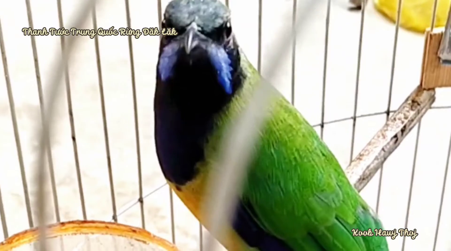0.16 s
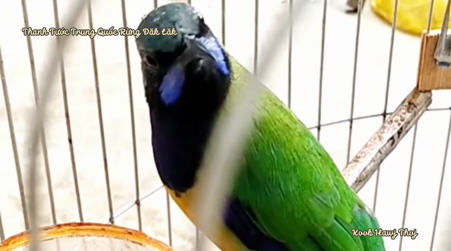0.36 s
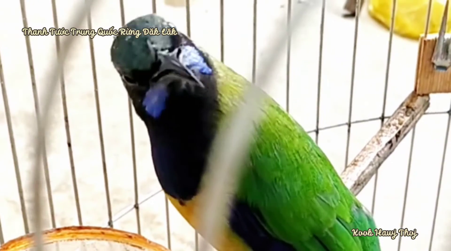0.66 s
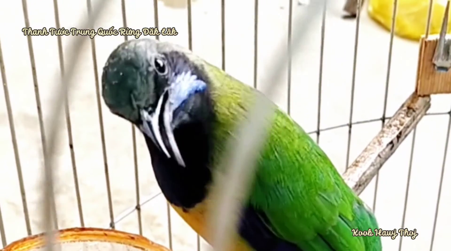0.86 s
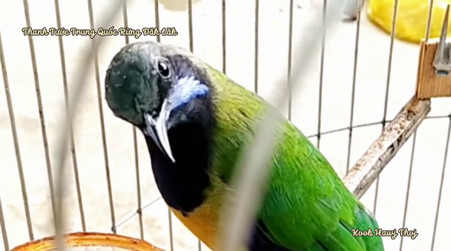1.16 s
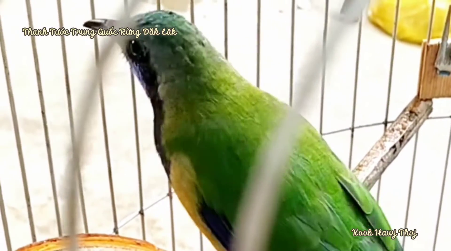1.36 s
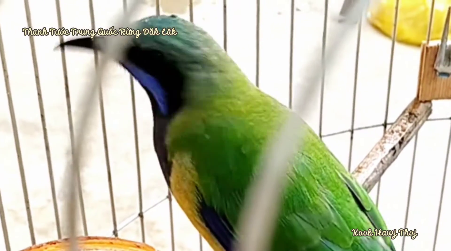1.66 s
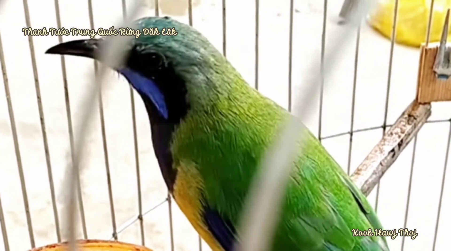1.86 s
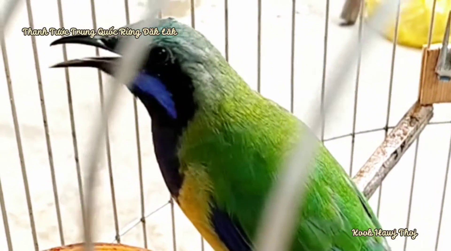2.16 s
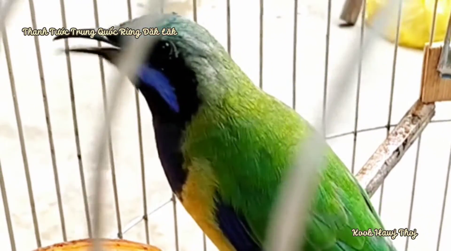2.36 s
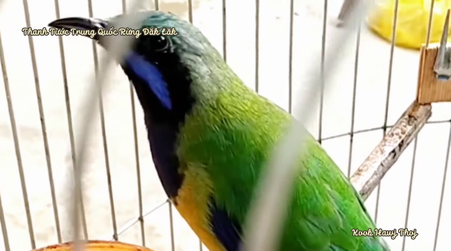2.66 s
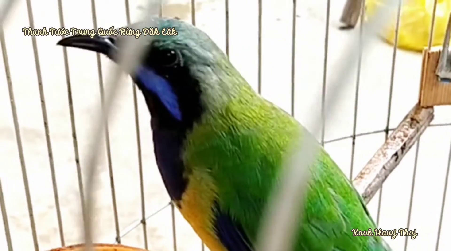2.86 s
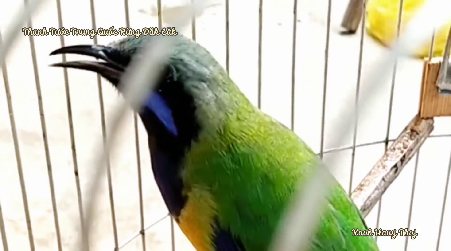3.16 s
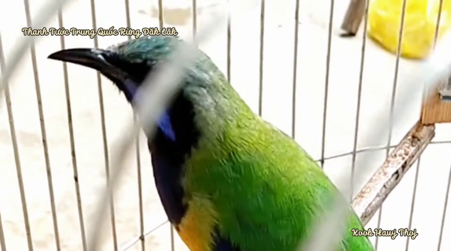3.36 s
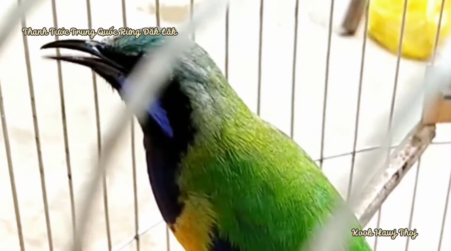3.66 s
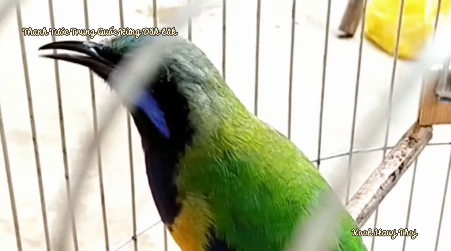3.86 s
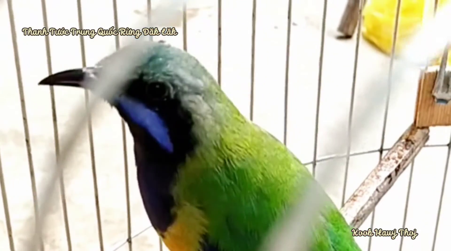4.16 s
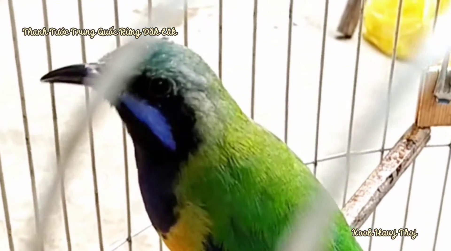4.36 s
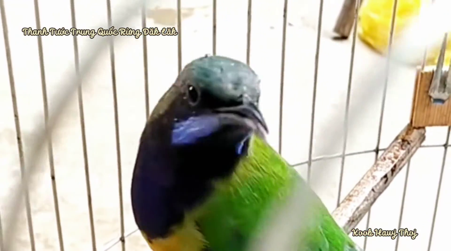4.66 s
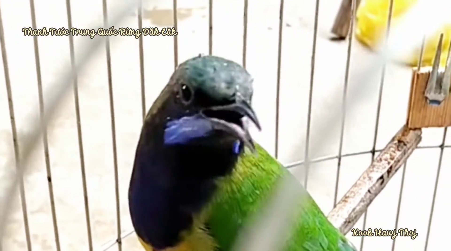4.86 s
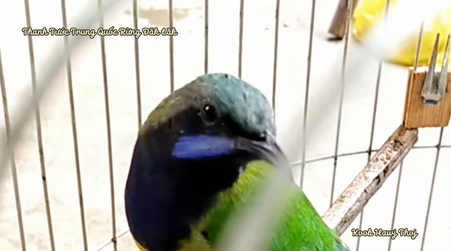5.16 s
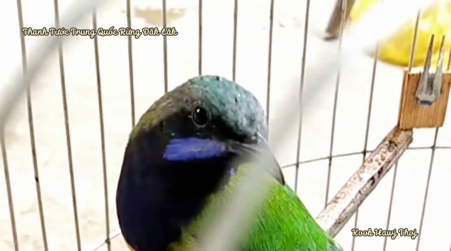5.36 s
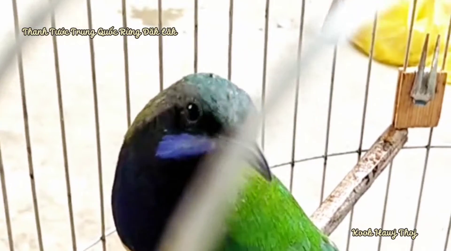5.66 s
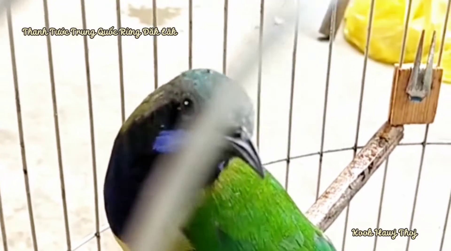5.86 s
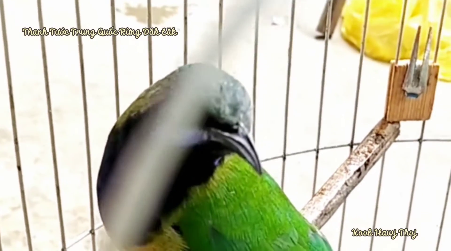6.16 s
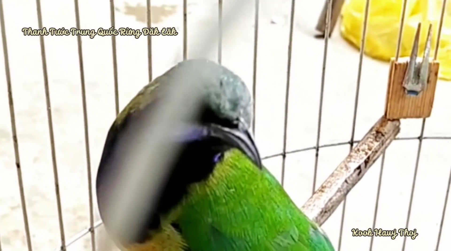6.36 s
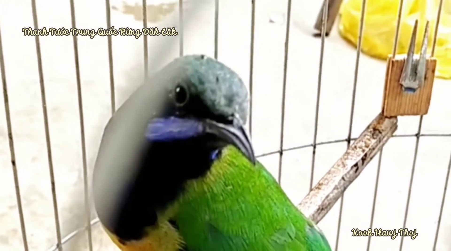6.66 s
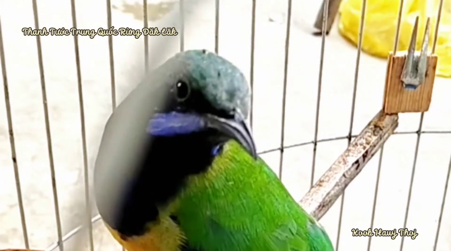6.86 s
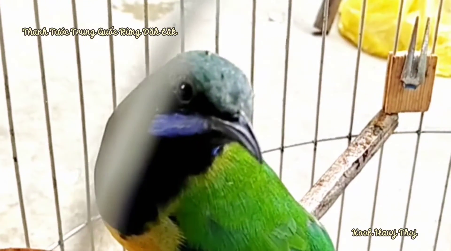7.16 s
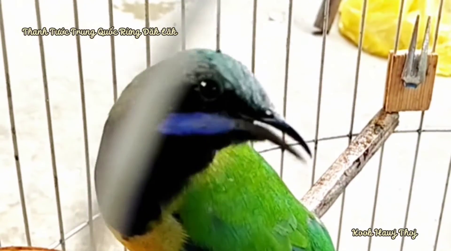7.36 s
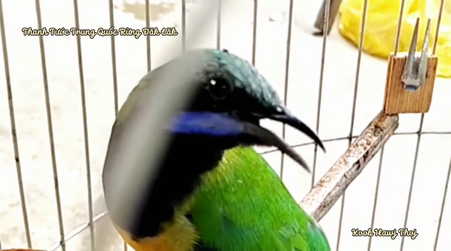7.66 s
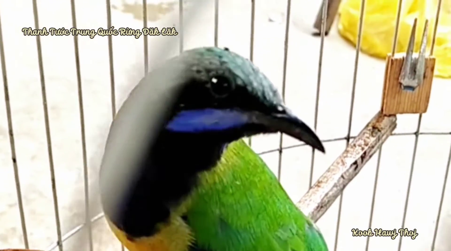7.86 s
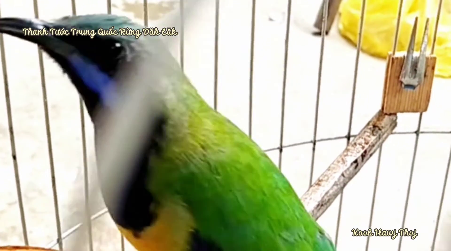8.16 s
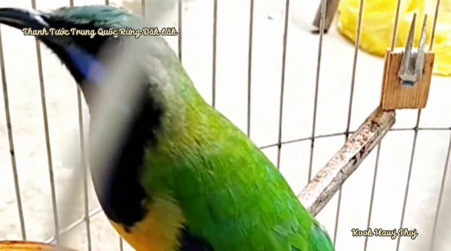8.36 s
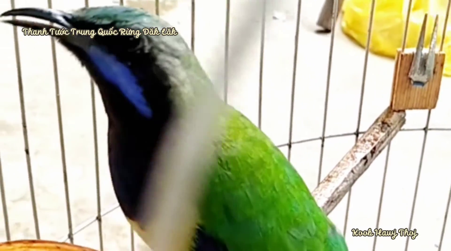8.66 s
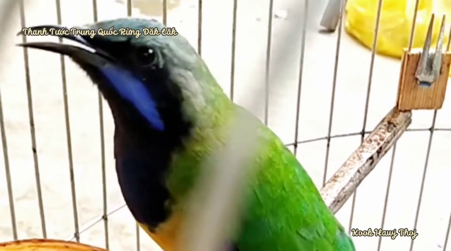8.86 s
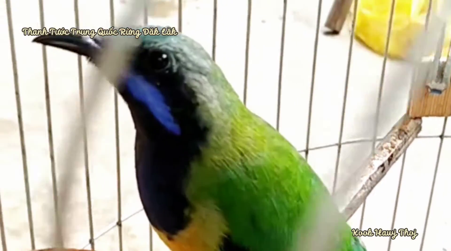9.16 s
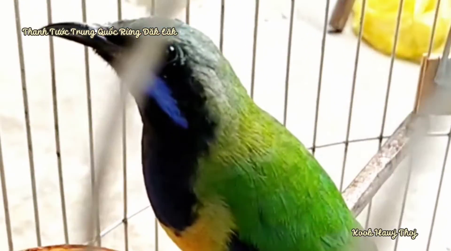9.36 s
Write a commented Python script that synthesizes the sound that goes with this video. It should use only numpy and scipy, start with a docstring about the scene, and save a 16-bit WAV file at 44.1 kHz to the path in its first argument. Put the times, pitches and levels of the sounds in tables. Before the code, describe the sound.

Piercing, clipped birdsong in short phrases very near the microphone, a second bird chirping nearby, claw ticks, puffs of wind and faint engine putter.

```python
"""A caged songbird sings close to a phone microphone in a yard with hard walls: held whistles, short slurs,
arches and peaked chirps, each a sum of partials shaped by a throat and answered by echoes and noise tails.
A bird in another cage chirps round a corner and claws tick on the perch. Puffs of air push the membrane, and
one knock hits the phone. A small engine putters as pulses ringing a pipe, thin far whistles call, and bands
of noise make the yard's murmur and far twitter. A limiter ducks everything after the loudest peaks."""
import sys
import numpy as np
from scipy import signal
from scipy.io import wavfile
from scipy.ndimage import uniform_filter1d, minimum_filter1d

SR = 44100
rng = np.random.default_rng(int(sys.argv[2]) if len(sys.argv) > 2 else 0)


def how_loud(loudness_db):
    """Turn decibels into a plain amplitude multiplier (0 dB gives 1, 20 dB gives 10)."""
    steps = np.asarray(loudness_db, float) / 20
    return 10 ** steps


def waveform_to_disk(signal):
    """Save audio, clipped to [-1, 1], as 16-bit WAV at the path in sys.argv[1]."""
    frames = np.transpose(np.atleast_2d(signal))
    scaled = np.clip(frames, -1, 1) * 32767
    samples = np.round(scaled).astype(np.int16)
    wavfile.write(sys.argv[1], SR, samples)


N = 418950
LEAD = SR // 10   # samples: the song is under way before time zero
M = N + LEAD


def rms_one(x):
    """Scales a signal to an rms of 1."""
    return x / np.sqrt(np.mean(x ** 2) + 1e-20)


def in_time(rows):
    """Interpolates each column of a table over time, its first column being seconds."""
    s, *columns = np.transpose(rows)
    t = np.arange(M) / SR - LEAD / SR
    return [np.interp(t, s, column) for column in columns]


def at_hz(points, hz):
    """Reads a (Hz, dB) curve on a logarithmic frequency axis."""
    curve_hz, curve_db = np.array(points)[:, 0], np.array(points)[:, 1]
    return np.interp(np.log(hz), np.log(curve_hz), curve_db)


def filtered(x, hz, kind, order=2):
    """Butterworth filter."""
    return signal.sosfilt(signal.butter(order, hz, kind, fs=SR, output="sos"), x)


def drift(rate_hz, size):
    """Random wander of rms 1: noise kept below rate_hz."""
    settle = 4000   # samples thrown away while the filter starts
    noise = rng.standard_normal(size + settle)
    return rms_one(filtered(noise, rate_hz, "low", order=4)[settle:])


def resonate(x, hz, width_hz):
    """A single resonance, as of an air column."""
    r = np.exp(-np.pi * width_hz / SR)
    return signal.lfilter([(1 - r * r) / 2, 0, (r * r - 1) / 2],
                          [1, -2 * r * np.cos(2 * np.pi * hz / SR), r * r], x)


def add(out, s, piece, gains):
    """Lays a piece into each row of out at s seconds, with one gain per row."""
    i = round(s * SR) + LEAD
    out[:, i:i + len(piece)] += (np.array(gains)[:, None] * piece)[:, :M - i]


def shaped(top_s, level_db, top_hz, stretch, shape):
    """Rows (s, Hz, dB) of one note made from a pattern."""
    lag_s, share, shape_db = np.transpose(shape)[:3]
    return np.transpose([top_s + stretch * lag_s, share * top_hz, level_db + shape_db])


# colouring by the throat: pitch_hz, level_db
THROAT = [(700, -15), (1500, -17), (2500, -18.5), (3500, -5.5), (5000, 3.5), (6200, -6), (7800, -12.5),
          (9500, -26.5), (12000, -34), (16000, -14.5)]
# source strength of partials 1-5: level_db
OVERTONE_DB = [-3, -10.5, -13.5, -27.5, -12.5]
WARBLE_HZ = 160.9   # rate of the level flutter
SHIMMER = .14   # unsteady breath pressure shakes the level
RASP, RASP_FADE_HZ = 1, 2600   # the labia flap noisily at low pitch, steadier higher up


def stroke(rows, warble=0, rough=1, bright_db=0):
    """One syrinx stroke: a few partials, shaped by the throat relative to the fundamental."""
    s, hz, level_db = np.transpose(rows)
    t = np.arange(s[0], s[-1], 1 / SR)
    pitch = uniform_filter1d(np.interp(t, s, hz), size=80)
    pitch = pitch * (1 + 0.0043 * drift(174, len(t)))
    phase = 2 * np.pi * (np.cumsum(pitch) / SR + rng.random())
    tone = np.zeros(len(t))
    for k, source_db in enumerate(OVERTONE_DB, 1):
        throat_db = at_hz(THROAT, k * pitch) - at_hz(THROAT, pitch)
        gain = how_loud(source_db + bright_db * (k > 1) + throat_db)
        audible = k * pitch < .4 * SR   # no partials near half the sample rate
        tone += gain * audible * np.sin(k * phase)
    flutter = 1 + warble * np.sin(2 * np.pi * (WARBLE_HZ * (t - s[0]) + 0.25 * drift(45, len(t))))
    shimmer = 1 + SHIMMER * drift(360, len(t))
    low_pitch = np.exp(-(pitch / RASP_FADE_HZ) ** 2)
    rasp = shimmer + rough * RASP * low_pitch * drift(1200, len(t))
    edges = np.clip(np.minimum(t - s[0], s[-1] - t) / .002, 0, 1)
    return tone * flutter * rasp * edges * how_loud(np.interp(t, s, level_db))


# the sweep of a whistle: share of the sweep's length, pitch_hz, level_db
SWEEP_SHAPE = [(0, 1108, -28), (.27, 2749, -27), (0.602, 3564, -19), (.85, 4956, -6), (1.001, 5130, -0.5)]
BUZZ_S, BUZZ_HZ, BUZZ_DB = .011, 705.6, -18.5   # lead before the sweep, pitch, level below its first point
HOLD_HZ, RELEASE_S, RELEASE_DB = 5340, 0.0084, -11.5
SWING_HZ, SWINGS_PER_S, SWING_FADE_S = 276, 39.8, 0.024   # the pitch swings about the hold before it settles
# the level dips as the other side falls silent
HANDOVER_S, HANDOVER_WIDTH_S, HANDOVER_DB = 0.017, 0.0063, -2.5


def whistle(start_s, sweep_s, hold_s, end_hz, level_db):
    """Rows (s, Hz, dB): buzz, sweep, a dying swing about the slowly drifting hold, release."""
    share, sweep_hz, sweep_db = np.transpose(SWEEP_SHAPE)
    sweep = np.transpose([start_s + share * sweep_s, sweep_hz, level_db + sweep_db])
    buzz = (start_s - BUZZ_S, BUZZ_HZ, sweep[0, 2] + BUZZ_DB)
    t = np.arange(.003, hold_s, .002)
    swing = SWING_HZ * np.exp(-t / SWING_FADE_S) * np.cos(2 * np.pi * SWINGS_PER_S * t)
    hold_hz = HOLD_HZ + (end_hz - HOLD_HZ) * t / hold_s - swing
    dip_db = HANDOVER_DB * np.exp(-((t - HANDOVER_S) / HANDOVER_WIDTH_S) ** 2)
    release_db = RELEASE_DB * np.clip(1 - (hold_s - t) / RELEASE_S, 0, 1)
    hold = np.transpose([start_s + sweep_s + t, hold_hz, level_db + dip_db + release_db])
    return np.array([buzz, *sweep, *hold])


# long whistles, one side of the syrinx sweeps up from a buzz and holds:
# start_s, sweep_s, hold_s, final pitch_hz, level_db
WHISTLES = [(0.351, 0.022, 0.08, 5610, 3), (0.5163, 0.029, 0.06, 5530, 7), (2.0324, 0.032, 0.069, 5590, 2),
            (2.1874, 0.03, 0.082, 5600, 1.5), (3.503, 0.025, 0.076, 5490, 3.5),
            (3.6728, 0.025, 0.081, 5560, 1), (4.5908, 0.026, 0.061, 5634, 5), (4.727, 0.04, 0.066, 5640, 5),
            (8.4379, .030, 0.079, 5680, 5), (8.6162, 0.031, 0.059, 5760, 2.5),
            (8.86, 0.024, 0.077, 5166, 5)]
WARBLE_DEPTH = .22   # level flutter (0-1)


def whistles():
    """One side of the syrinx holds a fluttering tone; both rows, to microphone and walls, get it alike."""
    out = np.zeros((2, M))
    for note in WHISTLES:
        rows = whistle(*note)
        add(out, rows[0][0], stroke(rows, WARBLE_DEPTH), [1, 1])
    return out


# the other side overshoots above each whistle's start and falls back on to it:
# top_s, level_db, top pitch_hz, stretch (factor)
OVERSHOOTS = [(0.371, -3, 6300, 0.9), (0.538, -0.5, 6150, 0.84), (2.058, -7, 6200, 0.97),
              (2.216, -3, 6218, 0.86), (3.524, -2, 6170, 1.17), (3.694, -2.5, 6270, 1),
              (4.615, -6.5, 6750, 0.97), (4.756, -2, 6250, 0.96), (8.463, 4, 6200, 0.61),
              (8.638, -2.5, 6100, 1.2), (8.88, -2, 6300, 0.86)]
# shape of an overshoot: lag_s from the top, share of the top pitch, level_db
OVERSHOOT_SHAPE = [(-.022, .4, -22), (-.014, .66, -13), (-.009, .84, 0), (-.005, .96, 0), (0, 1.0, 0),
                   (.006, .96, 0), (.012, .89, -3), (.022, .85, -9), (.034, .9, -20)]


def overshoots():
    """The other side of the syrinx sounds a second, higher tone over each whistle's start."""
    out = np.zeros((2, M))
    for note in OVERSHOOTS:
        rows = shaped(*note, OVERSHOOT_SHAPE)
        add(out, rows[0][0], stroke(rows), [1, 1])
    return out


FLICK_START_HZ, FLICK_FADE_DB = 5570, -7.5


def flick(start_s, rise_s, fall_s, top_hz, level_db):
    """Rows (s, Hz, dB): the pitch is thrown up, slows and turns over while the level fades."""
    t = np.linspace(0, rise_s + fall_s, 7)
    hz = top_hz - (top_hz - FLICK_START_HZ) * (1 - t / rise_s) ** 2
    return np.transpose([start_s + t, hz, level_db + FLICK_FADE_DB * (t / t[-1] - .5)])


# quick high flicks, most leading into or starting with a slur, one before an arch:
# start_s, rise_s, fall_s, top pitch_hz, level_db
FLICKS = [(0.678, 0.017, .002, 7680, -14), (0.748, .009, 0.0081, 7250, -9),
          (2.382, 0.018, 0.0075, 7530, -17), (2.452, 0.016, 0.017, 7880, -9.5),
          (3.838, 0.018, 0.0017, 7600, -14.5), (4.877, 0.014, 0.0066, 7420, -7.5),
          (4.947, .021, 0.0029, 7420, -3.5), (5.487, 0.02, .002, 6540, -10),
          (8.768, 0.016, 0.0028, 7700, -13.5)]


def flicks():
    """Quick high arcs of pitch, each one stroke."""
    out = np.zeros((2, M))
    for note in FLICKS:
        rows = flick(*note)
        add(out, rows[0][0], stroke(rows), [1, 1])
    return out


SLUR_HZ, SLUR_RISE_HZ_PER_S, SLUR_ONSET_DB, SLUR_DROP_S, SLUR_DROP_DB = 5018, 75000, -13, .009, -13.5
# the climb is almost even, soft until the knee and then swelling:
# shares of its time, pitch step and onset softness at the knee
SLUR_KNEE = (0.32, .3, 0.93)
SLUR_SAG_HZ = 254   # the held pitch sinks towards the final one, at most this far


def slur(start_s, length_s, start_hz, end_hz, level_db):
    """Rows (s, Hz, dB): a climb to the held pitch, a slow sag, then a drop as the breath gives out."""
    rise_s = abs(SLUR_HZ - start_hz) / SLUR_RISE_HZ_PER_S
    when, up, soft = SLUR_KNEE
    knee_hz = start_hz + up * (SLUR_HZ - start_hz)
    sagged_hz = max(end_hz, SLUR_HZ - SLUR_SAG_HZ)
    return np.array([(start_s, start_hz, level_db + SLUR_ONSET_DB),
                     (start_s + when * rise_s, knee_hz, level_db + soft * SLUR_ONSET_DB),
                     (start_s + rise_s, SLUR_HZ, level_db),
                     (start_s + length_s - SLUR_DROP_S, sagged_hz, level_db),
                     (start_s + length_s, end_hz, level_db + SLUR_DROP_DB)])


# low held part of each short slur: start_s, length_s, start pitch_hz, final pitch_hz, level_db
SLURS = [(0.697, 0.038, 4430, 3880, 1), (0.754, 0.043, 3800, 4904, 2.5), (2.396, 0.049, 4190, 4500, 1.5),
         (2.454, 0.067, 3470, 4930, 1.5), (3.849, 0.048, 3970, 3360, 0.5), (4.892, .035, 4540, 4780, 2.5),
         (4.948, 0.071, 3620, 4926, 4.5), (8.785, 0.043, 5050, 4940, 1)]
THROB_DEPTH, THROB_PER_S = .5, 54.5   # the held part throbs, strongest as it reaches its pitch


def slurs():
    """Short held strokes whose level throbs once the pitch is reached."""
    out = np.zeros((2, M))
    for note in SLURS:
        rows = slur(*note)
        tone = stroke(rows, bright_db=-4)
        held_s = np.maximum(np.arange(len(tone)) / SR - (rows[2][0] - rows[0][0]), 0)
        throb = 1 + THROB_DEPTH * np.cos(2 * np.pi * THROB_PER_S * held_s)
        add(out, rows[0][0], tone * throb, [1, 1])
    return out


# arches, up, over and steeply down: top_s, level_db, top pitch_hz, stretch (factor)
ARCHES = [(-0.024, 9, 4440, 0.98), (1.608, -9, 4250, 0.91), (2.596, -19.5, 4224, 0.86),
          (3.1005, 6.5, 4440, 0.91), (4.231, 8.5, 4425, 1.05), (4.8126, -8.5, 4230, 0.76),
          (5.373, -17.5, 4350, 0.83), (5.4185, -10, 4236, 0.73), (5.51, 9.5, 4585, 1.0),
          (6.858, -7.5, 4406, 0.94), (7.984, 7, 4433, .8), (8.061, -15.5, 4250, 0.93)]
# shape of an arch, point by point: lag_s from the top
ARCH_LAG_S = [-.022, -.014, -.007, 0, .01, .02, .027, .034, .043]
# shape of an arch: share of the top pitch
ARCH_SHARE = [.63, .86, .97, 1, .95, .86, .74, .45, .29]
# shape of an arch: level_db
ARCH_DB = [-27, -4, 2.5, -0.2, 3, -1, -4.5, -28.5, -26]
ARCH_AWAY_DB, AWAY_PER_DB = 6, -0.34   # how much more goes to the walls; soft ones are sung facing away


def arches():
    """Smooth strokes with weak overtones, sent to the walls relatively more the softer they are."""
    out = np.zeros((2, M))
    shape = np.transpose([ARCH_LAG_S, ARCH_SHARE, ARCH_DB])
    for note in ARCHES:
        rows = shaped(*note, shape)
        to_walls = how_loud(ARCH_AWAY_DB + AWAY_PER_DB * note[1])
        add(out, rows[0][0], stroke(rows, rough=0, bright_db=-13.0), [1, to_walls])
    return out


# peaked chirps: top_s, level_db, top pitch_hz, stretch (factor), low lead-in level_db
CHIRPS = [(7.2754, -14, 7900, 0.71, 8.5), (7.3305, -5.5, 7230, 0.89, -6.5), (7.382, -3, 8560, 1, 0),
          (7.449, 6, 8040, 0.98, -10), (7.526, 8.5, 7190, 0.93, -16), (7.5964, 10, 8030, 0.87, -7)]
# shape of a chirp: lag_s from the top, share of the top pitch, level_db, share of the lead-in level
CHIRP_SHAPE = [(-.021, .22, -20, 1.0), (-.011, 0.24, -17.5, 0.15), (-.009, 0.31, -11.5, 0.69),
               (-.005, 0.61, 4.5, 0.22), (0, 0.99, -9.5, 0), (.007, .72, 4, 0), (.016, .46, 2, 1),
               (0.026, 0.25, -46, 0.59)]


def chirps():
    """Pitch shoots up to a peak and down again, with a low lead-in of its own strength."""
    out = np.zeros((2, M))
    for *note, lead_db in CHIRPS:
        rows = shaped(*note, CHIRP_SHAPE)
        rows[:, 2] += lead_db * np.array(CHIRP_SHAPE)[:, 3]
        add(out, rows[0][0], stroke(rows, rough=0.56, bright_db=2.5), [1, 1])
    return out


def song():
    """All strokes of the near bird; row 0 goes straight to the microphone, row 1 to the walls."""
    return whistles() + overshoots() + flicks() + slurs() + arches() + chirps()


# claws on the perch: start_s, level_db (before the 11 dB cut in ticks)
TICKS = [(0.343, -3), (0.666, -2), (3.497, -2), (3.789, -11), (3.799, 0.5), (3.83, -18), (4.482, -32),
         (5.907, -11), (7.947, -8), (9.454, -14)]


def ticks():
    """Short dry cracks of claw on wood and wire: bursts of noise dying within milliseconds."""
    out, t = np.zeros((2, M)), np.arange(300) / SR
    for s, level_db in TICKS:
        burst = rng.standard_normal(300) * np.exp(-t / 0.001)
        add(out, s, how_loud(level_db - 11) * filtered(burst, [400, 5000], "band"), [1, 1])
    return out


# a bird in another cage: top_s, level_db, top pitch_hz, stretch (factor)
NEIGHBOUR_CHIRPS = [(0.458, -9.5, 7230, 0.83), (0.641, -7, 7300, 1.1), (0.8052, -8.5, 7480, 0.77),
                    (0.891, -13, 7450, 1), (0.97, -11, 7860, 1.32), (1.049, -7.5, 7560, 0.95),
                    (1.1278, -6.5, 8010, 0.99), (1.208, -5, 7340, 0.89), (1.285, -6.5, 8050, 1.33),
                    (6.1164, -10, 6970, 1.04), (6.214, -9.5, 7660, 1.08), (6.291, -13, 7550, 1.26),
                    (6.395, -8.5, 7110, 0.94), (6.471, -5.5, 7240, 0.91), (6.539, -6.5, 7240, 1.1),
                    (8.7216, -12.5, 7240, 1.57), (8.976, -14.5, 7300, 1.205), (9.057, -10.5, 7140, 0.84),
                    (9.131, -6.5, 7450, 0.8), (9.215, -9.5, 7210, 1.13), (9.2895, -7, 7590, 0.82),
                    (9.371, -9.5, 7570, 0.82)]
# its chirp is strongest on the way down: lag_s from the top, share of the top pitch, level_db
NEIGHBOUR_SHAPE = [(-.022, .28, -37), (-.012, .31, -21.5), (-.005, .67, -4), (0, 0.98, -12.5),
                   (.005, .8, -3), (.01, .63, 6), (0.018, 0.423, -18.5)]


def neighbour(centre_hz=5100, width_hz=2000, scatter_s=0.0045, away_db=6, slap_s=0.016, slap_db=-9):
    """Chirps from another cage: heard round a corner, narrowed, scattered, with a slap off one wall."""
    out = np.zeros((1, M))
    for note in NEIGHBOUR_CHIRPS:
        rows = shaped(*note, NEIGHBOUR_SHAPE)
        add(out, rows[0][0], stroke(rows, bright_db=3.0), [1])
    t = np.arange(2000) / SR
    paths = rng.standard_normal(2000) * np.exp(-t / scatter_s) * .12
    paths[0] = .55   # the shortest way
    paths = paths + how_loud(slap_db) * np.roll(paths, round(slap_s * SR))
    narrowed = resonate(out[0], centre_hz, width_hz) + 0.65 * out[0]
    heard = signal.fftconvolve(narrowed, paths / np.sqrt(np.sum(paths ** 2)))[:M]
    return heard * how_loud([[0], [away_db]])   # more goes to the walls


# single echoes off the yard walls: delay_s, level_db
ECHOES = [(.006, -16), (.018, -16), (.034, -22), (.08, -26)]
TAIL_DB, TAIL_T60_S, LATE_DB, LATE_T60_S = -14, 0.31, -28.5, 0.3


def walls(x):
    """A few smeared echoes, a dense tail and a fainter one of much the same length, all dull in the treble."""
    t = np.arange(SR) / SR
    answer = np.zeros(SR)
    for level_db, t60 in ((TAIL_DB, TAIL_T60_S), (LATE_DB, LATE_T60_S)):
        grain = rng.standard_normal(SR) * np.clip(t / 0.027, 0, 1)
        answer += how_loud(level_db) * grain * how_loud(-60 * t / t60) * np.sqrt(6 * np.log(10) / (t60 * SR))
    echoes = np.zeros(SR)
    for delay_s, level_db in ECHOES:
        echoes[round(delay_s * SR)] = how_loud(level_db)
    rough_wall = rng.standard_normal(350) / np.sqrt(350)   # smears each echo
    answer = answer + np.convolve(echoes, rough_wall)[:SR]
    return signal.fftconvolve(x, filtered(answer, 5160, "low"))[:M]


# puffs of air on the membrane: start_s, push (-1 to 1), length_s
PUFFS = [(1.335, 0.2, 0.039), (2.636, 0.23, 0.015), (2.665, 0.22, 0.017), (2.696, 0.37, 0.023),
         (3.798, 0.29, 0.0054), (5.905, 0.33, 0.038), (5.979, 0.42, 0.024), (6.483, 0.75, 0.044),
         (6.554, 0.68, 0.027), (6.592, 0.7, 0.024), (6.753, 0.5, 0.017), (6.914, 0.81, 0.033),
         (7.009, 0.76, .025), (7.128, 0.7, 0.026), (7.313, 0.53, 0.039), (7.56, 1, 0.044),
         (7.663, 1, 0.014), (7.667, 0.92, 0.017), (7.721, -0.19, 0.0095), (7.75, -0.2, 0.015),
         (7.841, -0.3, 0.021), (7.912, -0.34, 0.029), (9.087, 0.25, 0.034), (9.192, 0.35, 0.027)]


def puffs():
    """Each puff is a quick push; the vent behind the membrane lets it swing back."""
    out = np.zeros((1, M))
    for s, push, length_s in PUFFS:
        bump = np.sin(np.linspace(0, np.pi, round(length_s * SR))) ** 0.8
        add(out, s, bump, [push])
    return filtered(out[0], 4.5, "high")


KNOCK_S, KNOCK_DB = 7.2525, 9.5


def knock():
    """A hard tap on the phone: a spike, a rebound the other way and a slow return."""
    out, t = np.zeros((1, M)), np.arange(2000) / SR
    spike = 2.97 * np.exp(-t / .00008)
    rebound = np.exp(-t / 0.00021)
    slow_return = 0.39 * np.exp(-t / 0.0099)
    add(out, KNOCK_S, spike - rebound - slow_return, [how_loud(KNOCK_DB)])
    return out[0]


# a small engine across time: time_s, firings per second, level_db
ENGINE = [(0, 21.6, -39), (.6, 22.4, -36), (1.2, 23.2, -34), (1.9, 24.2, -35), (2.3, 24.6, -43),
          (3, 25.2, -40), (4.3, 26.4, -42), (5, 26.8, -46), (6.5, 27, -52), (9.5, 27, -52)]
# resonances of its exhaust pipe: pitch_hz, width_hz, level_db
ENGINE_PIPE = [(130, 45, 0), (175, 40, -2), (280, 40, -6)]


def engine():
    """One uneven pulse per firing rings the exhaust pipe."""
    per_s, level_db = in_time(ENGINE)
    turns = np.cumsum(per_s * (1 + 0.005 * drift(8, M))) / SR
    fired = np.diff(np.floor(turns), prepend=0)
    pulses = fired * how_loud(0.8 * rng.standard_normal(M)) + 1e-18
    pulses = filtered(pulses, 220, "low", order=4)   # the silencer softens each pulse
    ringing = sum(how_loud(db) * resonate(pulses, hz, width_hz) for hz, width_hz, db in ENGINE_PIPE)
    return how_loud(level_db) * rms_one(ringing)


# thin far whistles: start_s, length_s, start pitch_hz, end pitch_hz, level_db
FAR_CALLS = [(1.64, 0.083, 567, 627, -38.5), (2.704, 0.095, 3120, 2790, -50),
             (2.876, 0.19, 3220, 2980, -43.5), (2.888, 0.21, 6100, 6100, -47.5),
             (2.943, 0.076, 3930, 3520, -45), (3.17, 0.15, 6080, 5960, -44), (3.26, 0.071, 3040, 2900, -45),
             (6.814, 0.028, 3070, 3600, -31), (7.135, 0.1, 3750, 3600, -39), (8.29, 0.079, 830, 763, -41),
             (8.387, 0.045, 3750, 3700, -46), (8.393, 0.058, 3300, 3380, -37)]


def far_calls():
    """Faint gliding sines with a slight waver, sent to the walls at twice the direct strength."""
    out = np.zeros((2, M))
    for s, length_s, start_hz, end_hz, level_db in FAR_CALLS:
        size = round(length_s * SR)
        pitch = np.linspace(start_hz, end_hz, size) * (1 + 0.0029 * drift(40, size))
        tone = np.sin(2 * np.pi * np.cumsum(pitch) / SR)
        add(out, s, how_loud(level_db) * np.hanning(size) ** .5 * tone, [1, 2])
    return out


# colour of the yard's far noise: pitch_hz, relative level_db per Hz
YARD = [(20, 1.5), (60, -14), (130, -13.5), (200, -21), (320, -31), (500, -30.5), (1100, -31.5),
        (2300, -38.5), (3300, -38), (4500, -27.5), (5600, -58), (8200, -56), (14700, -50), (16000, -54.5)]
# its two parts across time: time_s, murmur level_db (as heard at 300-1500 Hz), twitter level_db
YARD_LEVEL = [(0.0, -46.5, -41.5), (7.28, -48, -43), (9.5, -48, -39.5)]


def yard(patchy_db=1.5, twitter_flicker_db=3.5):
    """Half-octave bands of far noise; the bands of far birds flicker and have their own level."""
    murmur_db, twitter_db = in_time(YARD_LEVEL)
    white = rng.standard_normal((2, M))   # neighbouring bands take turns
    edges = 20 * 2 ** np.arange(0, 10.1, .5)
    murmur, twitter, shared = 0, 0, drift(3.05, M)
    for k, (low, high) in enumerate(zip(edges, edges[1:])):
        hz = np.sqrt(low * high)
        band = how_loud(at_hz(YARD, hz)) * filtered(white[k % 2], [low, high], "band")
        if 2500 < hz < 7500:
            twitter = twitter + band * how_loud(twitter_flicker_db * drift(8.6, M))
        else:
            murmur = murmur + band * how_loud(patchy_db * (shared + drift(30, M)))
    murmur = murmur / np.std(filtered(murmur, [300, 1500], "band"))
    return how_loud(murmur_db) * murmur + how_loud(twitter_db) * rms_one(twitter)


def scene():
    """Birds and claws reach the microphone directly and off the walls; the rest is added as it is."""
    direct, sent = song() + ticks() + neighbour() + far_calls()
    return (direct + walls(sent) + puffs() + knock() + engine() + yard())[None]


def roll_off(x):
    """The treble ends steeply here."""
    return signal.sosfilt(signal.butter(12, 16130, fs=SR, output="sos"), x)


def record(dry, ceiling=.9, hold_s=.089, sag=0.89):
    """A limiter holds its gain down after each peak; loud sound drags the bias down; the converter clips."""
    size = round(hold_s * SR)
    held = -minimum_filter1d(-np.abs(dry), size, origin=(size - 1) // 2)   # highest peak of the last hold_s
    gain = uniform_filter1d(np.minimum(1, ceiling / (held + 1e-9)), size=60)
    limited = dry * gain
    bias = filtered(filtered(limited, 1000, "high") ** 2, 70, "low")
    sagged = filtered(limited - sag * bias, 2.5, "high", order=1)
    clipped = np.clip(sagged, -1, 1)
    finished = signal.sosfilt(signal.cheby2(12, 60, 15900, fs=SR, output="sos"), clipped)
    return roll_off(finished[:, LEAD:])


dry = scene()
out = record(dry)
waveform_to_disk(out)
```